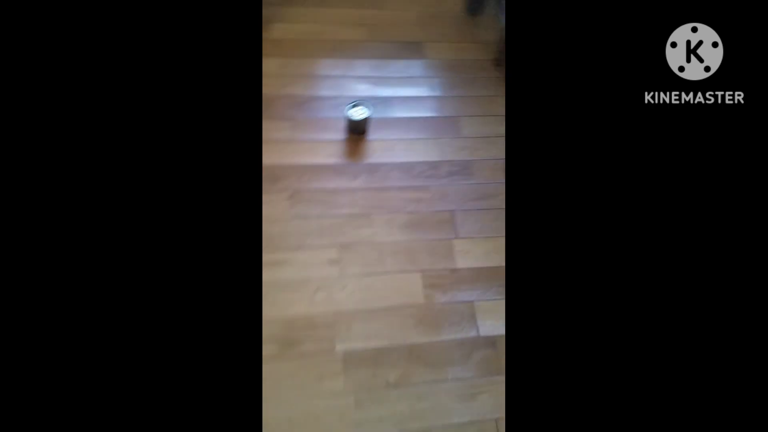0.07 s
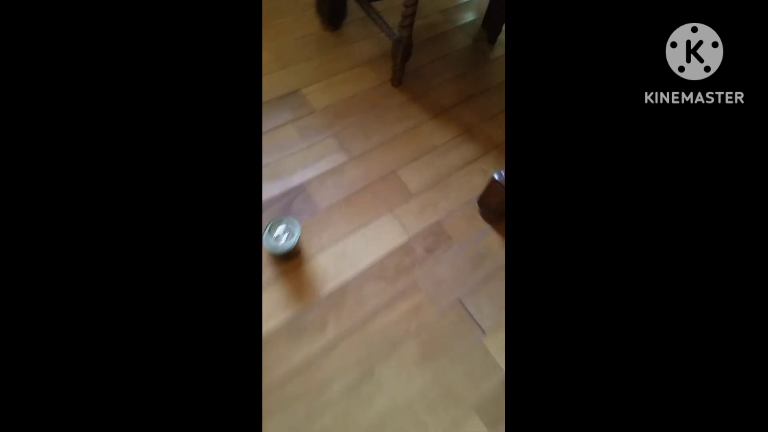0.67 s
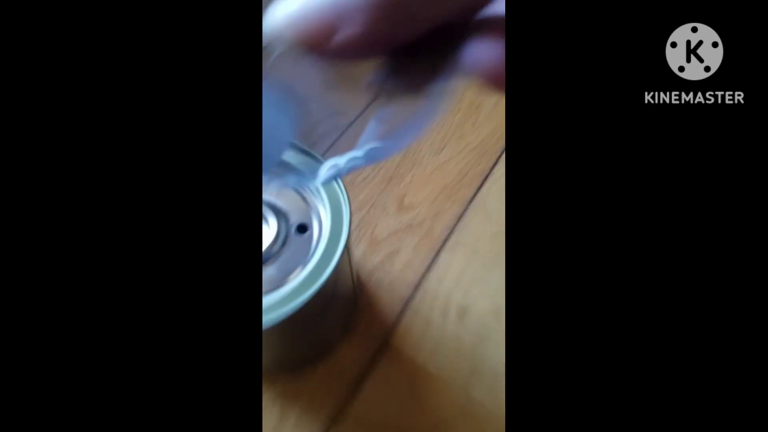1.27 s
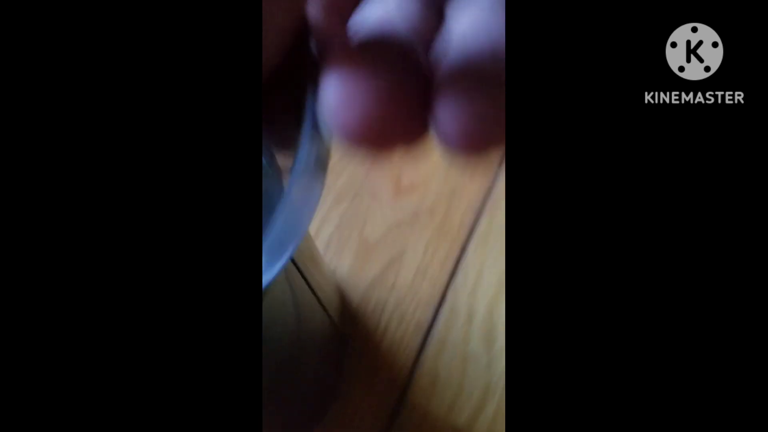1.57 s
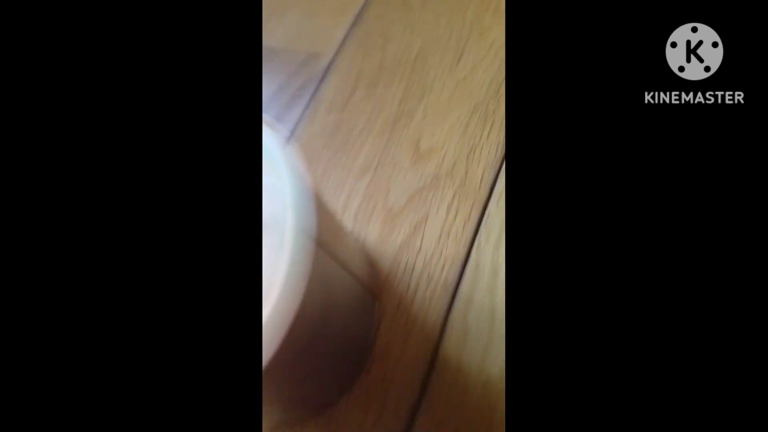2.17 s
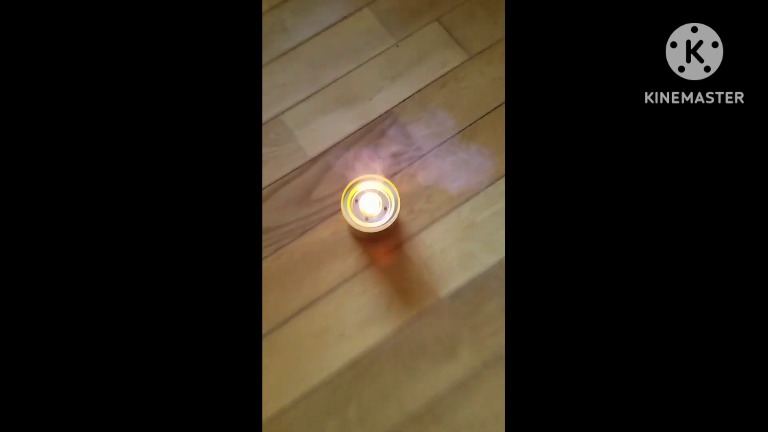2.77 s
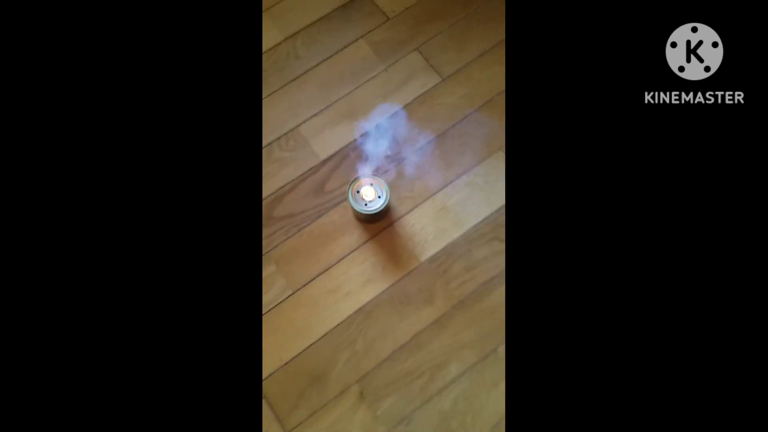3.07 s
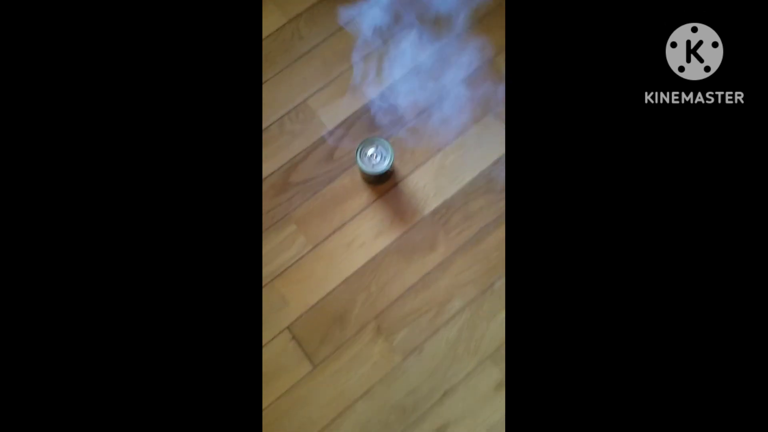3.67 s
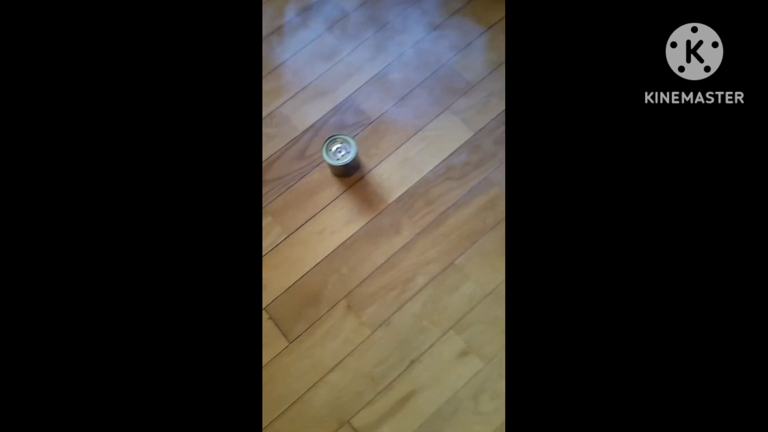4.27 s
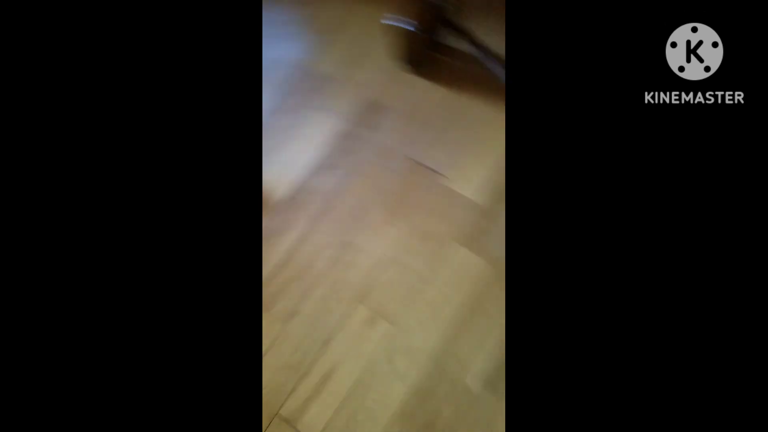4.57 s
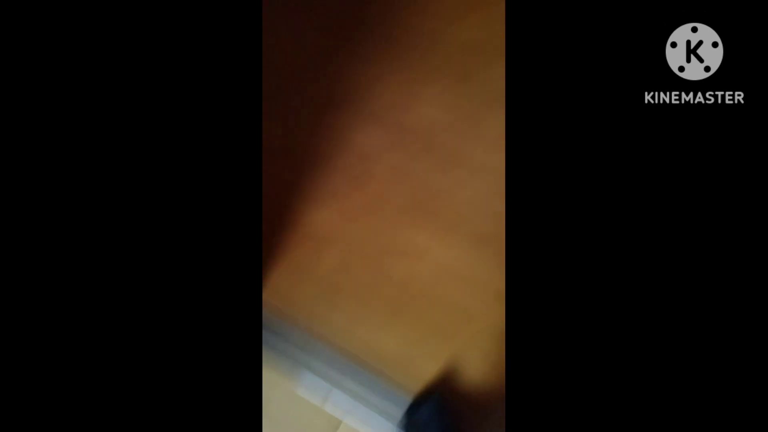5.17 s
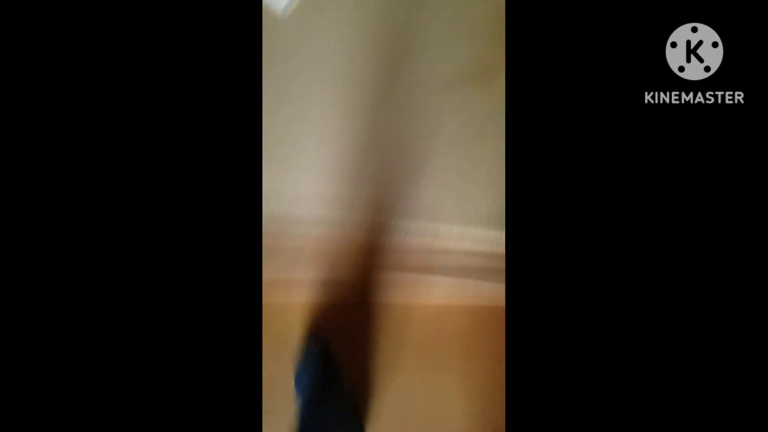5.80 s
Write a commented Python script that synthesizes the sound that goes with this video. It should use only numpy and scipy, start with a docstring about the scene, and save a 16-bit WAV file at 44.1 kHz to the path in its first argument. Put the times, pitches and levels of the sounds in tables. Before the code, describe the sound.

Dull steps on floorboards, close metallic lighter clicks, a brief crackling flare and a knock, then softer steps and rustling.

```python
"""Clothes rustle and a hand rumbles on a phone's case as someone crosses a small hard room.
Boards and case tick, and footfalls thud through the wooden floor. A lighter clicks close by,
its metal shell ringing; the charge of a small smoke canister catches with a crackling flare,
and something knocks and rings on. Then the smoke jet hisses faintly in its vent while the
person backs away with softer steps."""
import sys
import numpy as np
from scipy import signal
from scipy.fft import rfft, irfft
from scipy.io import wavfile

SR = 44100
rng = np.random.default_rng(int(sys.argv[2]) if len(sys.argv) > 2 else 0)


def materialize(psi):
    """Save the field psi as 16-bit PCM at rate SR to the path in sys.argv[1].

    A 1-D psi becomes a single channel; in a 2-D psi each row is a channel.
    """
    bounded = np.clip(np.atleast_2d(psi).T, -1, 1)
    quanta = np.round(bounded * 32767).astype(np.int16)
    wavfile.write(sys.argv[1], SR, quanta)


N = 266143
T = np.arange(N) / SR
MIC_LAG_S = .00042   # travel time between the two microphones


def from_db(db):
    """Amplitude ratio of a level in decibels."""
    return 10 ** (np.asarray(db) / 20)


def unit_rms(x):
    """Normalisation to unit mean power."""
    return x / np.sqrt(np.mean(x ** 2) + 1e-20)


def at_hz(points, hz):
    """Interpolation along log frequency."""
    known_hz, values = np.transpose(points)
    return np.interp(np.log(np.maximum(hz, 1)), np.log(known_hz), values)


def pan(db):
    """Left and right gains for a level difference, left minus right."""
    return from_db(np.array([[db / 2], [-db / 2]]))


def delay(x, lag_s):
    """Propagation delay of one channel."""
    return np.interp(T - lag_s, T, x)


def add(out, start_s, sound):
    """Superposition of a sound from start_s on."""
    i = round(start_s * SR)
    out[:, i:i + sound.shape[-1]] += sound[..., :N - i]


def colour(x, spectrum, size=8192):
    """Minimum-phase filter with the given spectral shape and unit power gain."""
    magnitude = from_db(at_hz(spectrum, np.linspace(0, SR / 2, size // 2 + 1)))
    cepstrum = irfft(np.log(magnitude))
    cepstrum[1:size // 2] *= 2   # folding the cepstrum makes the response causal
    cepstrum[size // 2 + 1:] = 0
    response = irfft(np.exp(rfft(cepstrum)))
    return signal.oaconvolve(x, response[None] / np.linalg.norm(response), axes=1)[:, :N]


def band(x, hz, ratio):
    """Band-pass filter from hz / ratio to hz * ratio."""
    edges_hz = [hz / ratio, min(hz * ratio, SR / 2 - 100)]
    return signal.sosfilt(signal.butter(2, edges_hz, "band", fs=SR, output="sos"), x)


def noise(correlation, size=N):
    """Partially correlated white noise at two microphones."""
    common = np.sqrt(correlation) * rng.standard_normal(size)
    return common + np.sqrt(1 - correlation) * rng.standard_normal((2, size))


def flicker(per_s, depth_db):
    """Random amplitude modulation."""
    steps = rng.standard_normal(size=4096)
    return from_db(depth_db * np.interp(T * per_s, np.arange(len(steps)), steps))


def envelopes(stretches):
    """One gain curve for each level column, interpolated in decibels."""
    times_s, *columns = np.vstack(stretches).T
    return [from_db(np.interp(T, times_s, levels_db)) for levels_db in columns]


def gaussian(peak_s, half_width_s):
    """Gaussian envelope, down to 1/e at half_width_s from its peak."""
    return np.exp(-((T - peak_s) / half_width_s) ** 2)


def burn(start_s, hold_s, swell_db_per_s, fade_db_per_s):
    """Exponential growth up to start_s, a plateau, then exponential decay."""
    swell_db = swell_db_per_s * np.maximum(start_s - T, 0)
    fade_db = fade_db_per_s * np.maximum(T - start_s - hold_s, 0)
    return from_db(-swell_db - fade_db) + 1e-12


def contact(grit, t60_s, size=2048):
    """Impact excitation: an impulse, then a decaying chatter of the surfaces."""
    chatter = rng.standard_normal((2, size)) * from_db(-60 * T[:size] / t60_s)
    hit = grit * unit_rms(chatter) / np.sqrt(size)
    hit[:, 0] += 1
    return hit / np.sqrt(1 + grit ** 2)


def ring(hz, t60_s, rise_s, size=SR):
    """Damped vibration of one mode with a finite rise time."""
    t = T[:size]
    return np.sin(2 * np.pi * hz * t) * from_db(-60 * t / t60_s) * (1 - np.exp(-t / rise_s))


# spectrum of the still room: frequency_hz, density_db
AIR_SPECTRUM = [(25, -34), (65, -3.5), (100, -10.5), (170, -9.5), (320, -12), (600, -16), (1300, -10.5),
                (2200, -9.5), (5000, -18.5), (16000, -22.5)]

def air(hum_hz=120):
    """Ambient noise: a steady broadband floor with a faint mains hum."""
    floor = from_db(-71.5) * colour(noise(0.21), AIR_SPECTRUM)
    hum = from_db(-72) * np.sin(2 * np.pi * hum_hz * T)
    return (floor + hum) * pan(-4)


# the hand shifting on the case, in two stretches: time_s, level_db
HAND_GRIP = [
    [(0.0, -64), (0.324, -54), (0.462, -50), (0.756, -53), (0.876, -33.5), (0.912, -51), (1.06, -51),
     (1.314, -60), (1.6, -58.5)],
    [(2.6, -72), (2.74, -71.5), (3.08, -62), (3.72, -75.5), (4.82, -67.5), (5.3, -56), (5.66, -64),
     (5.87, -70), (6.03, -49)],
]
# clothes rubbing, in three stretches: time_s, treble_db, middle_db
CLOTHES_RUBBING = [
    [(0.0, -60, -55.5), (0.146, -61, -55), (0.622, -61, -54.5), (0.976, -52, -50), (1.108, -54, -52),
     (1.456, -63.5, -59), (1.6, -70, -60.5)],
    [(2.6, -79.5, -71), (2.788, -71.5, -65.5), (3.062, -62.5, -62), (3.314, -66.5, -57.5),
     (3.522, -70.5, -62), (3.902, -76.5, -69), (4.1, -81.5, -72)],
    [(4.2, -75.5, -68), (4.632, -70.5, -63.5), (5.3, -66, -56.5), (5.408, -61.5, -56.5), (5.622, -69, -61),
     (5.836, -69, -59.5), (6.03, -64.5, -56.5)],
]
# quick strokes of a sleeve: peak_s, level_db, half_width_s
SLEEVE_STROKES = [(0.208, -54, 0.012), (0.505, -51.5, 0.0056), (0.822, -46, 0.061), (1.226, -53, 0.021),
                  (4.5, -61, 0.059), (4.831, -56.5, 0.042), (5.46, -55, 0.054), (5.892, -58.5, 0.058)]
# spectra of the hand's rumble and the clothes' middle and treble: frequency_hz, density_db
RUMBLE_SPECTRUM = [(12, -49.5), (20, -5.5), (54, 2.5), (76, 3), (107, 1.5), (143, -2), (258, -14),
                   (311, -9.5), (400, -19), (520, -46.5), (880, -120)]
SCUFF_SPECTRUM = [(120, -33), (200, -9.5), (308, -6), (509, -7.5), (631, -8.5), (712, -10.5), (774, -7.5),
                  (832, -10.5), (1080, -10), (1770, -9.5), (3500, -35), (4550, -44), (7700, -120)]
CLOTH_SPECTRUM = [(1290, -24), (2200, -2), (3020, -0.5), (5050, -8), (6260, -6), (6750, -7.5), (7710, -3),
                  (9100, -11.5), (12900, -3.5), (14600, -3), (15500, -11), (16000, -4.5)]

def rustle():
    """Friction noise: the hand rumbles through the case while sleeves and trousers rub."""
    grip, = envelopes(HAND_GRIP)
    treble, middle = envelopes(CLOTHES_RUBBING)
    strokes = sum(from_db(level_db) * gaussian(peak_s, half_width_s)
                  for peak_s, level_db, half_width_s in SLEEVE_STROKES)
    treble = np.hypot(from_db(5) * treble, strokes)   # incoherent sources add in power
    rumble = from_db(1) * grip * colour(noise(0.9), RUMBLE_SPECTRUM)
    scuff = from_db(-1.5) * middle * colour(noise(0.26) * flicker(120, depth_db=2), SCUFF_SPECTRUM)
    cloth = treble * colour(noise(0.033) * flicker(400, depth_db=1.34), CLOTH_SPECTRUM)
    left, right = rumble * pan(-5.5) + (scuff + cloth) * pan(-7.5)
    return np.array([delay(left, MIC_LAG_S), right])


# ticks of boards and case: start_s, ring_db, pitch_hz, snap_db, room_db
BOARD_TICKS = [(.208, -35.5, 3020, -26.5, 2.5), (.327, -25.5, 1930, -25, -0.5), (0.489, -27, 500, -42, -22),
               (.789, -18.5, 695, -33, 6), (1.199, -35, 1220, -29.5, 0), (1.33, -25.5, 458, -43, 1),
               (2.492, -52, 1800, -35, -4.5), (2.788, -43, 2606, -32, -12), (3.333, -31.5, 1610, -37, -5),
               (3.469, -34, 1595, -33.5, 1), (4.381, -39, 1500, -40, 9), (4.68, -28, 1510, -14.5, -3.5),
               (5.195, -17, 1360, -25.5, 1.5), (5.411, -30.5, 3550, -34, 1), (5.485, -31, 2060, -33, -6),
               (5.774, -41, 1640, -34.5, 4.5), (5.962, -34.5, 2080, -35, -12)]
# spectrum of a board's crack: frequency_hz, density_db
BOARD_SPECTRUM = [(100, -12), (400, -4.5), (900, 5), (2400, 2.5), (3800, -2), (5500, -8.5), (7500, -5.5),
                  (10000, -12.5), (14500, -12), (16000, -11)]

def ticks():
    """Impulse response: boards and case crack under shifting load. Returns direct sound, room feed."""
    direct, to_room = np.zeros((2, 2, N))
    for start_s, ring_db, pitch_hz, snap_db, room_db in BOARD_TICKS:
        crack = from_db(snap_db) * colour(contact(grit=1.2, t60_s=.009), BOARD_SPECTRUM)
        add(crack, 0, from_db(ring_db) * ring(pitch_hz, t60_s=0.0028, rise_s=0.000093, size=4096))
        add(direct, start_s, crack)
        add(to_room, start_s, from_db(room_db) * crack)
    left, right = direct * pan(-7.5)
    return np.array([delay(left, MIC_LAG_S), right]), to_room * pan(-8.5)


# thuds of the feet: peak_s, level_db, pitch_hz, half_width_s
FOOT_THUDS = [(0.331, -19.5, 65, .027), (.402, -36.5, 69.6, .03), (.753, -15.5, 67.6, .016),
              (0.785, -22, 71.5, 0.02), (1.009, -25, 111, 0.0061), (2.906, -48, 65.5, 0.021),
              (3.183, -41.5, 63, 0.032), (5.356, -32.5, 70.8, .012)]
# soles and trouser legs brushing the boards: start_s, level_db, centre_hz, t60_s
FOOT_SHUFFLES = [(0.791, -30.5, 107, 0.45), (.795, -38, 684, 0.2), (.895, -31.5, 131, 0.38),
                 (.992, -29.5, 147, .12), (1.125, -52, 1780, .2), (2.735, -54, 810, 0.14),
                 (3.07, -53, 2480, 0.27), (3.149, -39, 216, .17), (4.381, -53.5, 265, 0.36),
                 (4.69, -56.5, 2160, 0.73), (4.972, -52.5, 3000, 0.24), (5.083, -37.5, 114, 0.09),
                 (5.339, -44, 225, 0.22), (5.828, -48.5, 77, 0.63)]

def footfalls(brush_rise_s=0.014):
    """Forced vibration: each step drives the boards at one low pitch; friction adds bands of noise."""
    out = np.zeros((2, N))
    for peak_s, level_db, pitch_hz, half_width_s in FOOT_THUDS:
        flexing = np.sin(-2 * np.pi * pitch_hz * (T - peak_s))
        out += from_db(level_db) * gaussian(peak_s, half_width_s) * flexing
    rise = 1 - np.exp(-T[:SR] / brush_rise_s)
    for start_s, level_db, centre_hz, t60_s in FOOT_SHUFFLES:
        brush = unit_rms(band(noise(0.71, size=SR), centre_hz, 1.37)) * pan(-2.2)
        add(out, start_s, brush * from_db(level_db - 60 * T[:SR] / t60_s) * rise)
    return out * pan(-5)


# lighter clicks, then cracks of ignition: start_s, ring_db, pitch_hz, snap_db, pan_db, room_db
LIGHTER_CLICKS = [(1.6357, -15.5, 910, 0, 0, -14), (1.6705, -15, 1450, -16, -8.5, -8.5),
                  (1.7590, -25, 1130, -20.5, -0.5, -6), (1.8070, -1.5, 1130, 1.5, -8, -7),
                  (2.0345, -0.5, 1280, 5.5, -3, -10.5), (2.059, -4.5, 990, 0, -12, -15),
                  (2.0606, 0.5, 1510, 10.5, 10.5, -14.5), (2.0653, -11, 940, -8, -1.5, -5.5),
                  (2.0799, -6.5, 2110, 8, -6.5, -12), (2.0973, -13.5, 1310, -4.5, 1, -9)]
# modes of the small metal shell: pitch_hz, level_db, t60_s
SHELL_MODES = [(472, -4, 0.039), (798, -8, 0.028), (1013, -0.5, 0.018), (1240, -2, 0.021),
               (1330, 2.5, 0.0073), (1620, -9.5, 0.018), (2072, -7, .02), (2320, -16, 0.0089),
               (3500, 4.5, 0.0073), (3870, 5.5, 0.014), (7250, -1.5, .006)]
# spectrum of a hard snap, shared by the flare's sparks: frequency_hz, density_db
SNAP_SPECTRUM = [(100, -15.5), (280, -16.5), (430, 5.5), (620, -5), (1000, 2), (2200, 2.5), (3000, 1.5),
                 (3700, 2.5), (4800, -2), (7200, 0), (9200, -7), (12000, -5.5), (14500, -4.5), (16000, -5)]

def lighter(lag_s=.0003):
    """Modal ringing: each broadband snap sounds a metal shell. Returns direct sound, room feed."""
    direct, to_room = np.zeros((2, 2, N))
    for start_s, ring_db, pitch_hz, snap_db, pan_db, room_db in LIGHTER_CLICKS:
        click = from_db(snap_db) * colour(contact(grit=1.3, t60_s=.006), SNAP_SPECTRUM)
        for mode_hz, mode_db, t60_s in SHELL_MODES:
            octaves_away = np.log2(mode_hz / pitch_hz)
            loss_db = 2 + 16 * min(octaves_away ** 2, 1.4)   # favours modes near the click's pitch
            scatter_db = 2 * rng.standard_normal((2, 1))
            strength = from_db(ring_db + mode_db - loss_db + scatter_db)
            add(click, 0, strength * ring(mode_hz, t60_s, rise_s=0.0011, size=4096))
        add(direct, start_s, click * pan(pan_db))
        add(to_room, start_s, click * from_db(room_db))
    left, right = direct
    return np.array([left, delay(right, lag_s)]), to_room * pan(-6)


# spectrum of the burning charge: frequency_hz, density_db
FLARE_SPECTRUM = [(35, -7.5), (70, -1.5), (115, 7), (190, -3.5), (320, -5.5), (450, -9), (620, -11.5),
                  (800, 0), (1200, -2.5), (1550, -1), (2100, 2), (2900, -7.5), (5500, -16), (7200, -10),
                  (10000, -15), (15500, -12.5)]

def flare(catch_s=2.0283, hold_s=.07, fuse_hz=1460, sparks_per_s=80):
    """Combustion noise: a thin hiss swells until the charge catches in a rush with random cracks."""
    fuse = from_db(-40) * unit_rms(band(noise(0.1), fuse_hz, 1.33))
    fuse *= burn(catch_s, hold_s, swell_db_per_s=229.5, fade_db_per_s=200.5)
    rush = from_db(-28.5) * unit_rms(colour(noise(.3) * flicker(590, depth_db=1), FLARE_SPECTRUM))
    sparking = (rng.random(N) < sparks_per_s / SR) & (T > catch_s)
    sparks = from_db(-6) * colour(sparking * rng.uniform(-0.88, 1, (2, N)), SNAP_SPECTRUM)
    return fuse + (rush + sparks) * burn(catch_s, hold_s, swell_db_per_s=562.5, fade_db_per_s=519.5)


# the knock and its bounces: start_s, level_db
KNOCK_BLOWS = [(2.2666, -4.5), (2.2688, -3), (2.2718, -0.5), (2.2704, -5)]
# spectrum of a blow: frequency_hz, density_db
BLOW_SPECTRUM = [(50, -20), (150, -8), (250, -5.5), (380, 1), (560, -11.5), (820, -3), (1500, -3),
                 (1900, 7), (2450, -22), (2900, -18.5), (4000, -24.5), (6900, -27.5), (10000, -33),
                 (14600, -30)]
# modes of the struck object: pitch_hz, level_db, t60_s
STRUCK_MODES = [(132.7, -31, 0.22), (258, -47, 0.8), (770, -56, 0.2), (1240, -32.5, 0.18),
                (1273, -49, 0.35), (1508, -44.5, 0.49), (1770, -55, 0.41), (2000, -55, 0.31),
                (2840, -33.5, 0.12), (3840, -56, 0.32), (1940, -21, 0.012), (776, -14, 0.046)]

def knock(split_hz=14, hollow_hz=430, hollow_t60_s=1.25):
    """Beating: after quick bounces, a struck object rings in detuned mode pairs over a hollow drone."""
    blows, rings = np.zeros((2, 2, N))
    first_s = KNOCK_BLOWS[0][0]
    for start_s, level_db in KNOCK_BLOWS:
        add(blows, start_s, from_db(level_db) * contact(grit=1.0, t60_s=0.025))
    for pitch_hz, level_db, t60_s in STRUCK_MODES:
        twin_hz = pitch_hz + split_hz * rng.standard_normal()
        pair = ring(pitch_hz, t60_s, rise_s=0.0065) + 0.56 * ring(twin_hz, t60_s, rise_s=0.018)
        add(rings, first_s, from_db(level_db - 6) * pair)
    hollow = unit_rms(band(noise(1.0, size=SR), hollow_hz, 1.12))
    add(rings, first_s, hollow * from_db(-52 - 60 * T[:SR] / hollow_t60_s))
    return (colour(blows, BLOW_SPECTRUM) + rings) * pan(-6)


def smoke(full_s=3.3, hold_s=0.16, vent_hz=1600):
    """Jet noise in the resonance of the canister's vent: it builds slowly and stops short."""
    hiss = unit_rms(band(noise(0.24), vent_hz, 1.15)) * flicker(60, depth_db=2)
    flow = burn(full_s, hold_s, swell_db_per_s=25, fade_db_per_s=150)
    return from_db(-63.5) * flow * hiss * pan(-7.5)


# reverberation time of the room: frequency_hz, t60_s
ROOM_DECAY = [(100, 0.71), (450, 0.68), (1200, 0.8), (2500, 0.35), (5000, 0.59), (14000, 0.085)]
# spectrum at the onset of the reverberation: frequency_hz, level_db
ROOM_SPECTRUM = [(100, -7), (500, 2), (1200, -4), (3000, 6.5), (7000, 1), (15000, 7)]

def room(x, size=SR):
    """Reverberation: a diffuse tail, different at each microphone, whose top treble dies first."""
    t = T[:size]
    tail, white = 0, rng.standard_normal((2, 2, size))
    for k, hz in enumerate(np.geomspace(100, 12800, 15)):
        decay = from_db(at_hz(ROOM_SPECTRUM, hz) - 60 * t / at_hz(ROOM_DECAY, hz))
        tail = tail + band(white[k % 2], hz, 2 ** (1 / 4)) * decay
    tail *= (1 + 1.8 * np.exp(-t / 0.03)) * (t > .002)   # the floor answers first and loudest
    return signal.fftconvolve(x, tail / np.linalg.norm(tail[0]), axes=1)[:, :N]


def scene():
    """Superposition of all direct sounds and the reverberation of clicks, ticks, flare and knock."""
    clicks, clicks_to_room = lighter()
    boards, boards_to_room = ticks()
    rush, bump = flare(), knock()
    reverb = room(clicks_to_room + boards_to_room + from_db(-6.5) * rush + from_db(-8.5) * bump)
    return clicks + boards + rush + bump + reverb + smoke() + footfalls() + rustle() + air()


def record(dry, cutoff_hz=15700):
    """Soft saturation rounds the loudest peaks; a steep low-pass filter cuts the top."""
    rounded = 1.58 * np.tanh(dry / 1.224)
    return signal.sosfilt(signal.ellip(10, .1, 90, cutoff_hz, fs=SR, output="sos"), rounded)


dry = scene()
out = record(dry)
materialize(out)
```